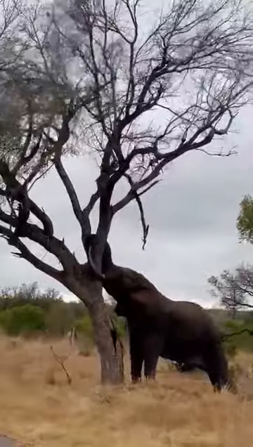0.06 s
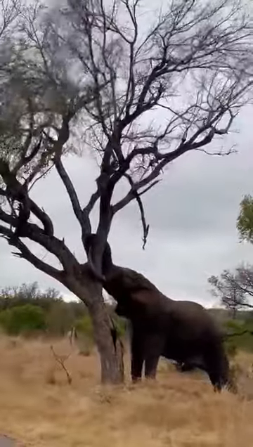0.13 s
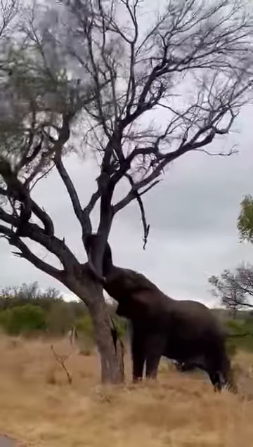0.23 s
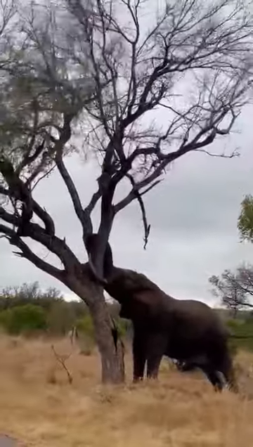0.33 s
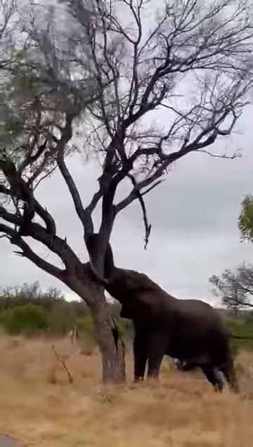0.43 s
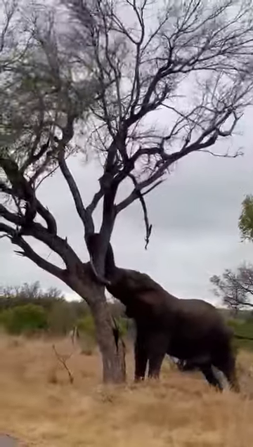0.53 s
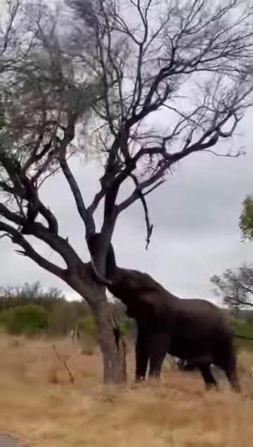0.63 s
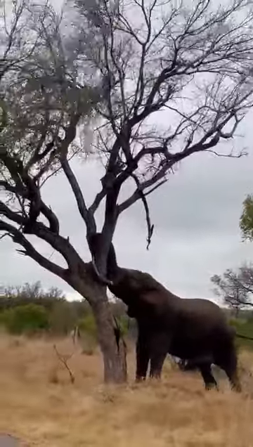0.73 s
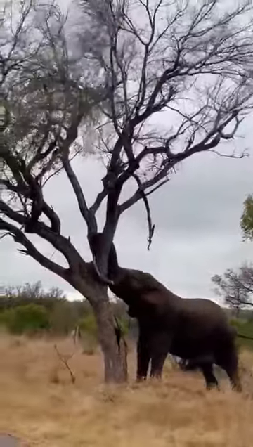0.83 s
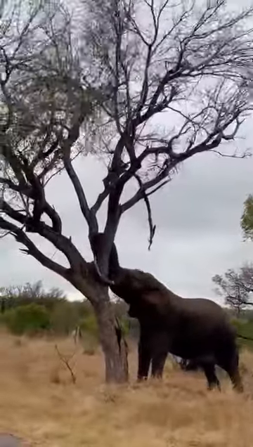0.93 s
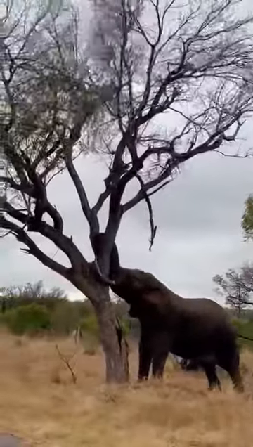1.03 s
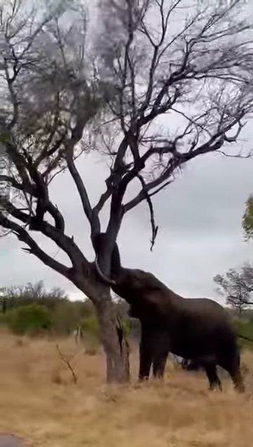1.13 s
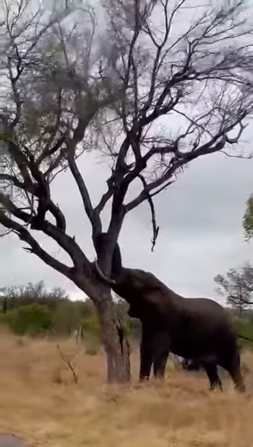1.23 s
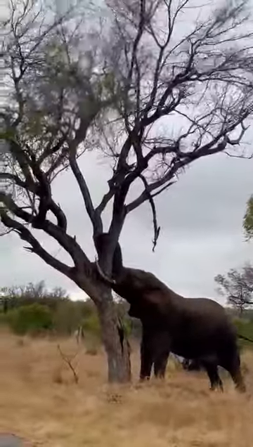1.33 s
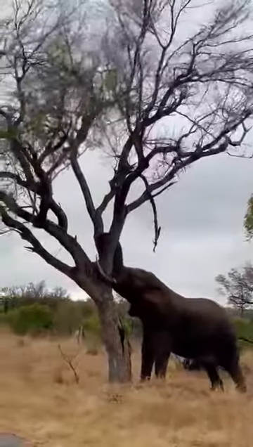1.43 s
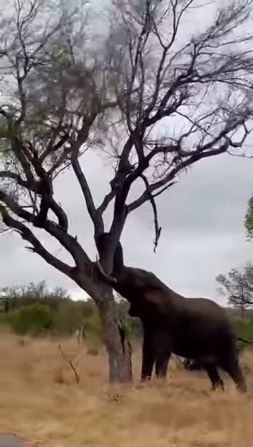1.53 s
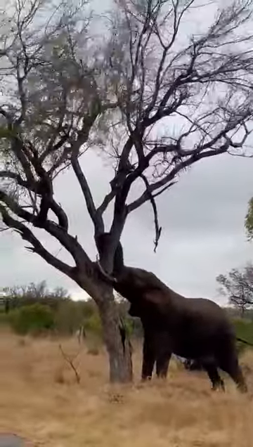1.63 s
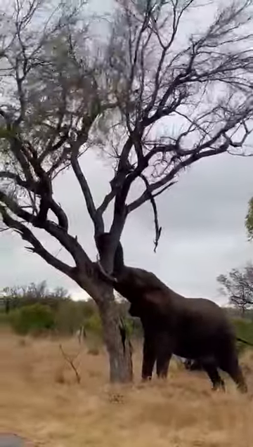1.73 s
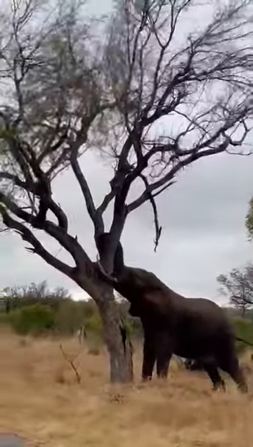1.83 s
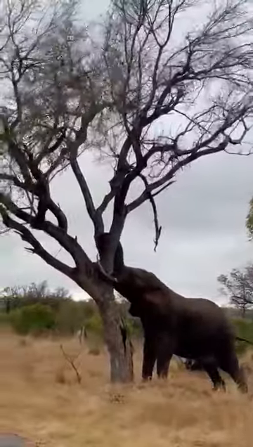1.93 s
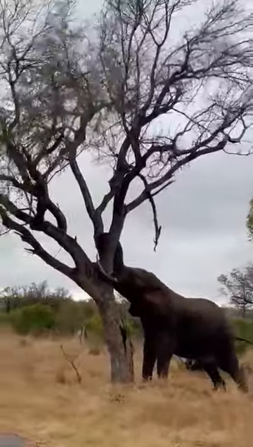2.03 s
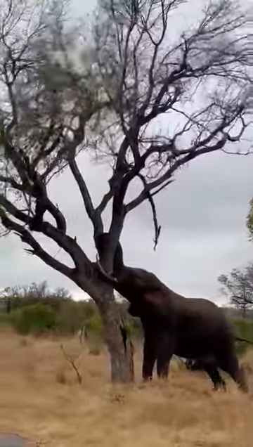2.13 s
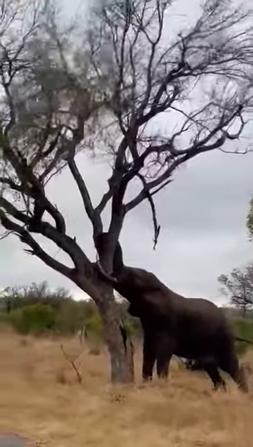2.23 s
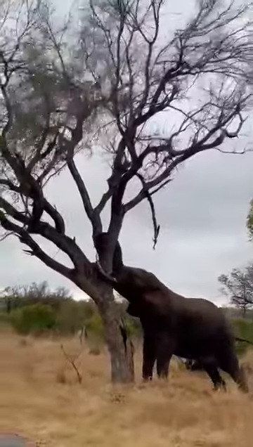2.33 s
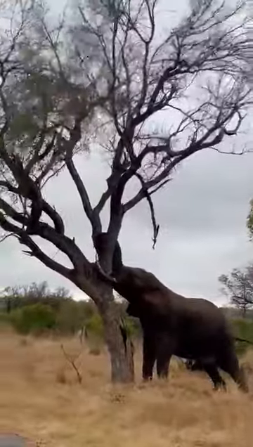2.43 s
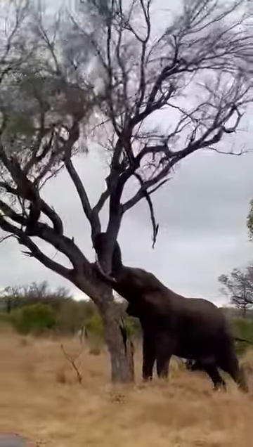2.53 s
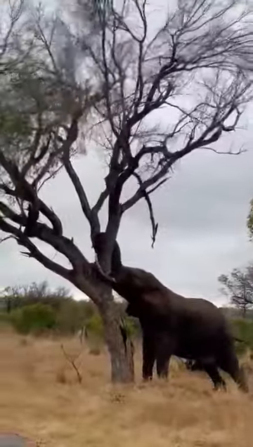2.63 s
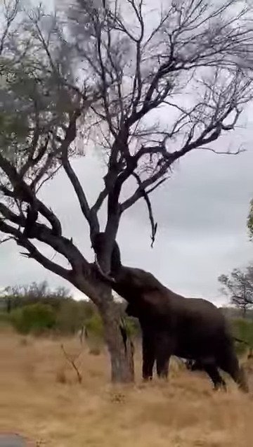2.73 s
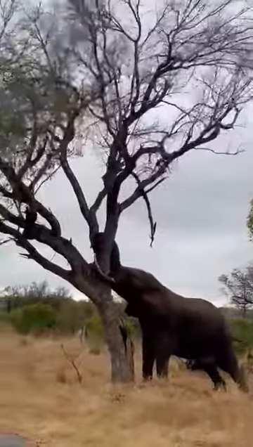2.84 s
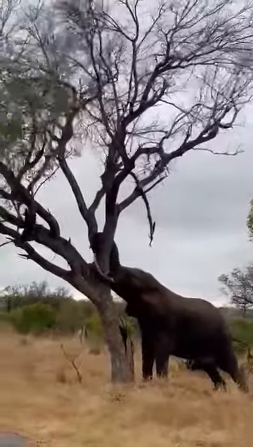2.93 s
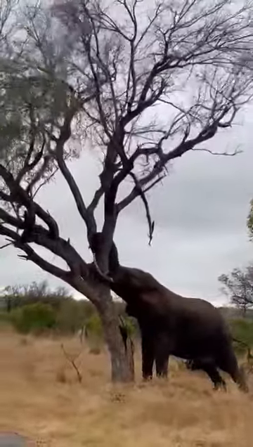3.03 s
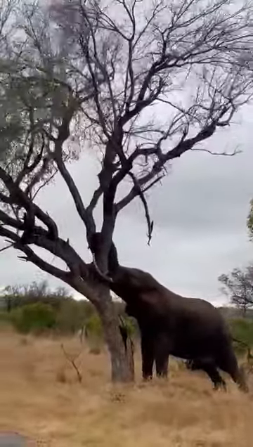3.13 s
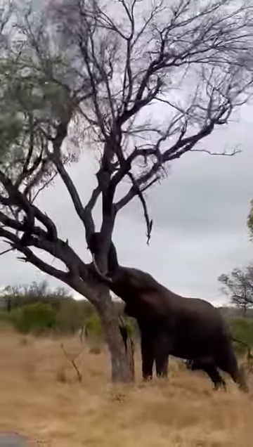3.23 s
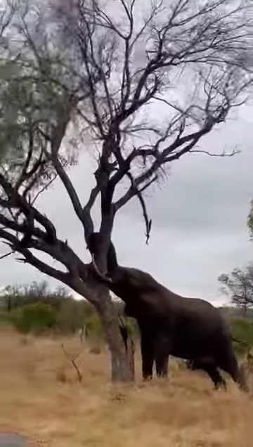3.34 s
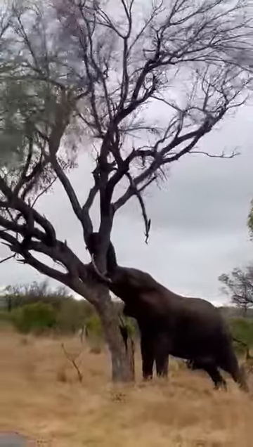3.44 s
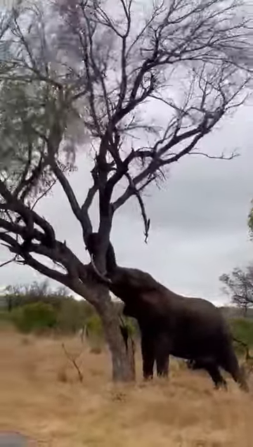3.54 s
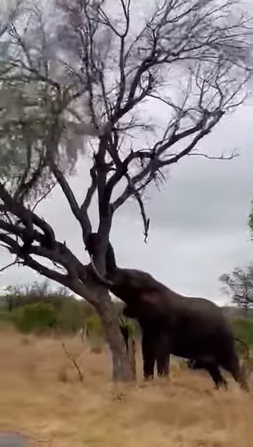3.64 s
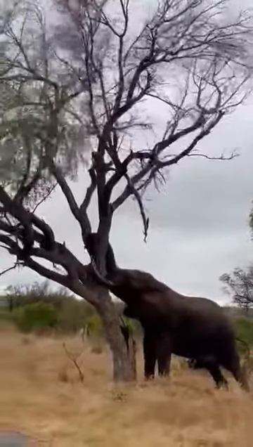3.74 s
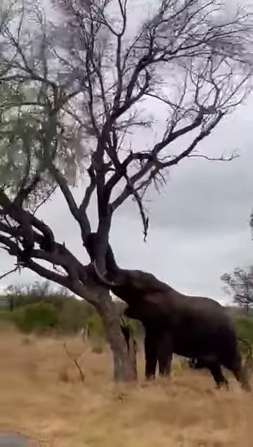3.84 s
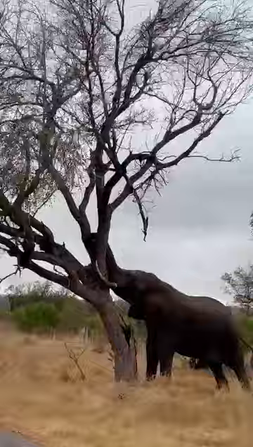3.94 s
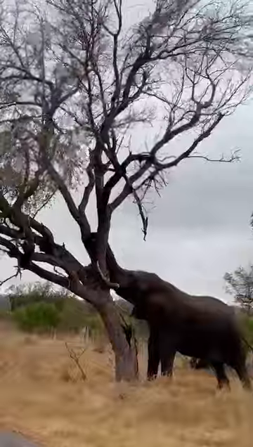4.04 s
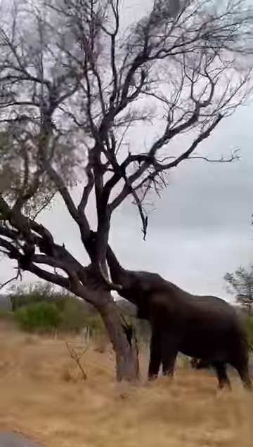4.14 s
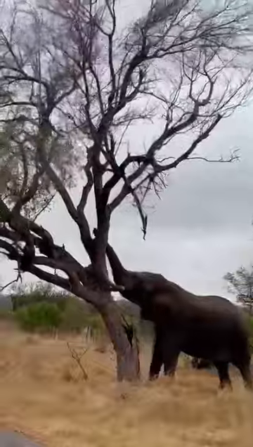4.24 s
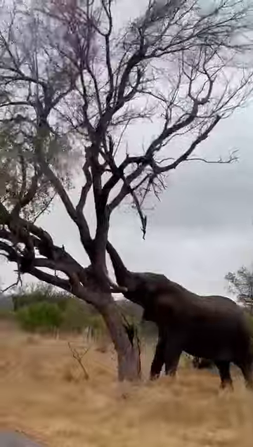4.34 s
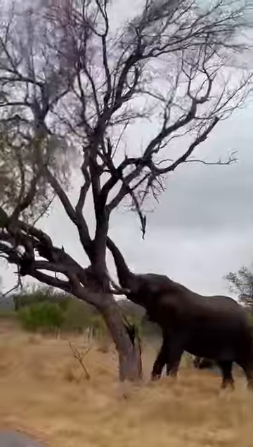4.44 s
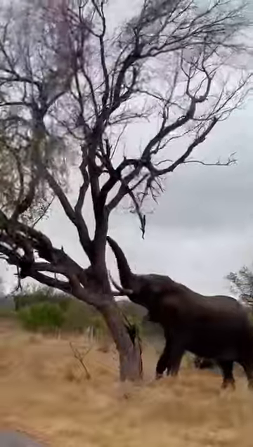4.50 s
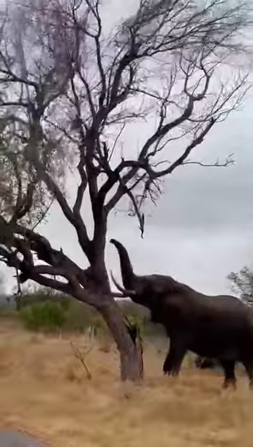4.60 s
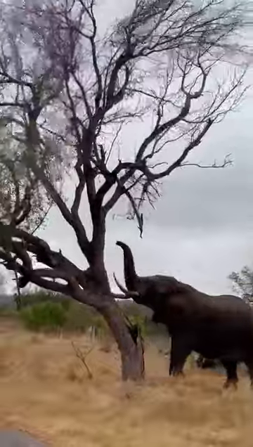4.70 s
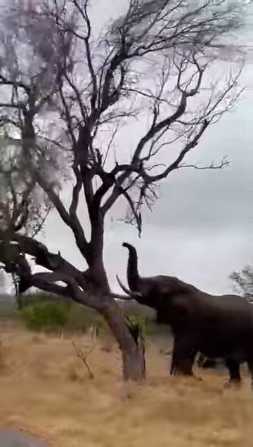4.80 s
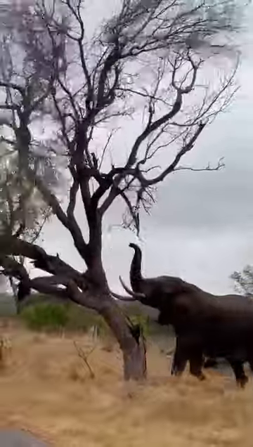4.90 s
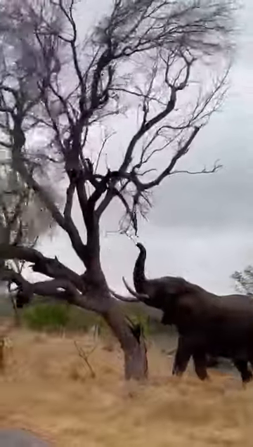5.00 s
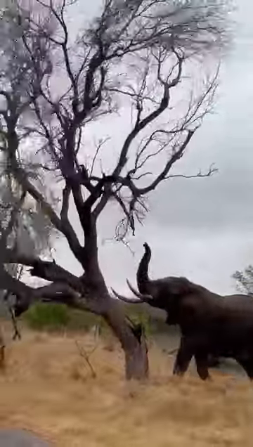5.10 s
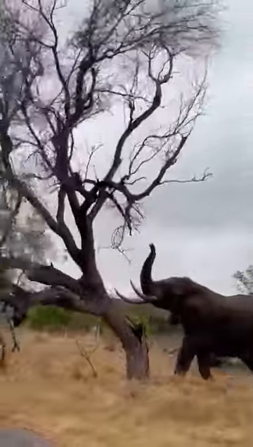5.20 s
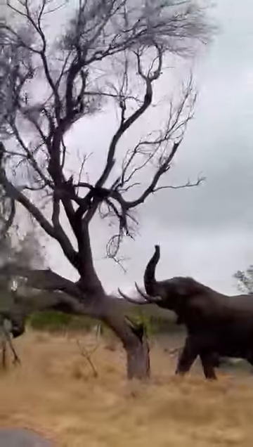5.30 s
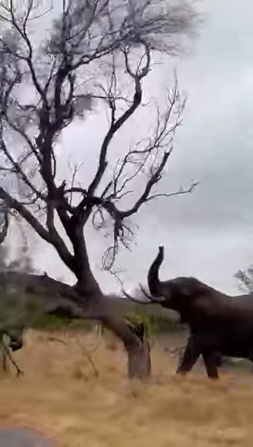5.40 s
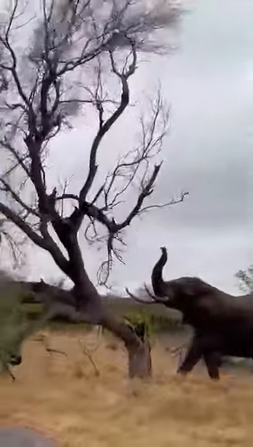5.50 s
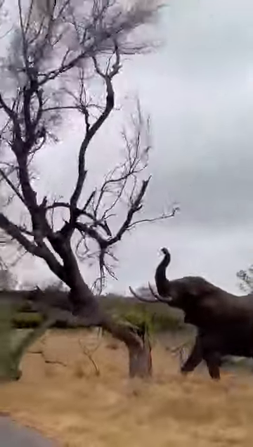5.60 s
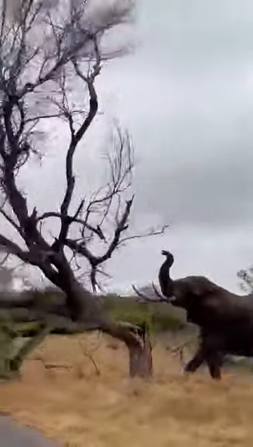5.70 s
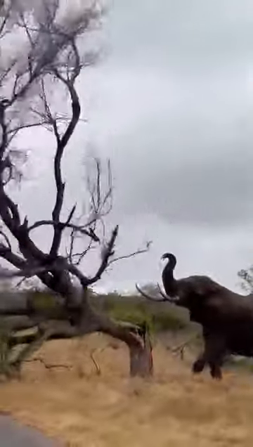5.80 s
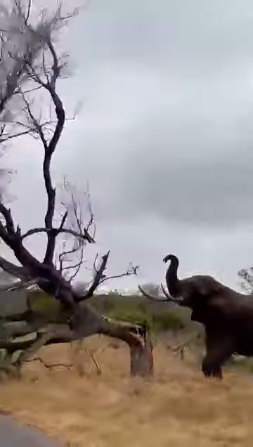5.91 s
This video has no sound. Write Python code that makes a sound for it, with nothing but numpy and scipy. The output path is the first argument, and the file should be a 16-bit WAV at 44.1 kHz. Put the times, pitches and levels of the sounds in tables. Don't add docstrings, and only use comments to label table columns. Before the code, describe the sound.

A trunk creaks in short stuttering groans, then wood fibres snap faster and faster until heavy limbs break and crash outdoors.

```python
import sys
import numpy as np
from scipy import signal
from scipy.fft import rfft, irfft
from scipy.io import wavfile
from scipy.ndimage import uniform_filter1d, minimum_filter1d

SR = 44100
rng = np.random.default_rng(int(sys.argv[2]) if len(sys.argv) > 2 else 0)


def store_pcm(level_fs):
    pcm = np.round(np.clip(level_fs, -1, 1) * 32767).astype(np.int16)
    wavfile.write(sys.argv[1], SR, np.atleast_2d(pcm).T)


def how_loud(loudness_db):
    steps = np.asarray(loudness_db, float) / 20
    return 10 ** steps


N = 262836

SIZE, LEAD_S = 4096, .01
HZ = np.maximum(np.fft.rfftfreq(SIZE, 1 / SR), 1)
AGE_S = np.arange(SIZE) / SR
SMALL_THUD_DB = 5.5


def curve(rows):
    rows = np.array(rows)
    return np.interp(np.arange(N) / SR, rows[:, 0], rows[:, 1])


def shape(hz, points):
    point_hz, point_db = np.transpose(points)
    return how_loud(np.interp(np.log(hz), np.log(point_hz), point_db))


def colour(x, points):
    return irfft(rfft(x) * shape(np.maximum(np.fft.rfftfreq(N, 1 / SR), 1), points), N)


def unit(x):
    return x / np.sqrt(np.mean(x ** 2))


def walk(rate_hz):
    k = int(SR / rate_hz)
    return uniform_filter1d(np.repeat(rng.standard_normal(N // k + 1), k), k)[:N]


def hump(hz, octaves):
    return np.exp(-.5 * (np.log2(HZ / hz) / octaves) ** 2)


def bending(cycles):
    return np.exp(-2j * np.pi * (cycles * np.log(HZ) + HZ * (LEAD_S - cycles / 3000)))


def peak(spectrum):
    wave = irfft(spectrum, SIZE)
    return wave / np.abs(wave).max()


def add(out, wave, s):
    i = int((s - LEAD_S) * SR)
    out[max(i, 0):i + SIZE] += wave[max(-i, 0):N - i]


def aftermath(rows, column, db, decay_s):
    rows, power = np.array(rows), np.zeros(N)
    np.add.at(power, (rows[:, 0] * SR).astype(int), how_loud(2 * (rows[:, column] + db)))
    return signal.lfilter([1], [1, -np.exp(-2 / (decay_s * SR))], power)


def plain():
    # frequency in Hz, level in dB per Hz.
    air_spectrum = [(15, -17), (25, -14), (49, 0), (358, -19.5), (500, -19.5), (6290, -56), (12000, -37),
                    (15600, -78)]
    air = colour(rng.standard_normal(N), air_spectrum)
    return how_loud(-69.5 + 7.5) * unit(air * how_loud(2.7 * walk(14)))


def wind():
    # start in seconds, level in dB, hold in seconds.
    gusts = [
        (1.604, -35, 0.035),
        (1.681, -39, 0.015),
        (1.731, -45.5, 0.067),
        (1.812, -49, 0.012),
        (4.264, -48, 0.026),
        (5.37, -37, 0.036),
        (5.596, -35, 0.014),
        (5.866, -26, 0.01),
    ]
    calm_db, rise_db_s, fall_db_s = -68.5, 697, 558
    t = np.arange(N) / SR
    levels_db = []
    for s, top_db, hold_s in gusts:
        rise_db = rise_db_s * np.maximum(s - t, 0)
        fall_db = fall_db_s * np.maximum(t - s - hold_s, 0)
        levels_db.append(top_db - rise_db - fall_db)
    level_db = np.maximum(np.max(levels_db, axis=0), calm_db)
    spectrum = [(15, -67), (35, 1.5), (60, 3.5), (110, -5.0), (250, -21.5), (600, -104)]
    puffs = colour(rng.standard_normal(N), spectrum)
    return unit(puffs * how_loud(1.0 * walk(8.0))) * how_loud(level_db)


def litter(rows):
    # frequency in Hz, level in dB per Hz.
    twig_spectrum = [(250, -48), (600, 6.5), (1600, 2.5), (3200, 10.5), (6500, -1.5), (9000, -37),
                     (13000, -25)]
    # frequency in Hz, level in dB per Hz.
    leaf_spectrum = [(250, -40), (600, 1), (1600, 3.5), (3200, 1.5), (4300, -1), (6500, -6), (9000, -16.5),
                     (13000, -16.5)]
    # time in seconds, share of smooth leaf hiss 0-1.
    leaf_share = [(0, .9), (2.9, .9), (3.0, .2), (5.55, .3), (5.75, .75)]
    # time in seconds, level in dB.
    shaking = [(0, -51), (.2, -59.5), (.42, -61.5), (.55, -54.5), (.7, -61.5), (1.0, -55.5), (1.6, -60.5),
               (2.28, -68), (2.34, -48.5), (2.7, -61.5), (2.9, -60.5), (3.15, -46), (4.4, -42.5),
               (4.85, -39.5), (5.45, -30), (5.65, -31.5), (5.75, -24), (5.96, -22.5)]
    clump = how_loud(1.5 * rng.exponential(size=N) + 2.2 * walk(60))
    clicks = (rng.random(N) < 1100 / SR) * clump * rng.standard_normal(N)
    smear = rng.standard_normal(1024) * np.exp(-AGE_S[:1024] / .001)
    twigs = unit(colour(signal.fftconvolve(clicks, smear)[:N], twig_spectrum))
    twigs = unit(colour(twigs, [(500, -2), (2200, -9), (7000, -5)]))
    leaves = unit(colour(rng.standard_normal(N), leaf_spectrum)) * how_loud(2.0 * walk(30))
    limb_spectrum = [(50, -12), (110, 17.5), (260, 14.5), (600, 12.0), (1200, -53.0)]
    limbs = unit(colour(rng.standard_normal(N), limb_spectrum)) * how_loud(0.41 * walk(30))
    shake = how_loud(curve(shaking))
    crackle = np.sqrt(shake ** 2 + aftermath(rows, column=1, db=-14.5, decay_s=.0092))
    rumble = np.sqrt((shake * how_loud(-7)) ** 2 + aftermath(rows, column=4, db=-17.5, decay_s=.039))
    share = curve(leaf_share)
    return crackle * (np.sqrt(share) * leaves + np.sqrt(1 - share) * twigs) + rumble * limbs


def creak(slips, load, modes, grit_db, soft_hz, bass_db, scrape_db, upper_cycles, early_s):
    # delay in ms, level in dB.
    forks = [
        (4.5, -5),
        (9.6, -6.5),
        (13.1, -11),
    ]
    out = np.zeros(N)
    drift = 1 + .01 * walk(8)
    paths = 1 + how_loud(-27) * rfft(rng.standard_normal(SIZE) * np.exp(-AGE_S / .012))
    paths = paths + sum(how_loud(db) * np.exp(-2j * np.pi * HZ * ms / 1000) for ms, db in forks)
    travel = HZ ** 2 / (HZ ** 2 + 90 ** 2) / (1 + (HZ / soft_hz) ** 4)
    bass = 1 / (1 + (HZ / 700) ** 4)
    rub = np.exp(-.5 * (1000 * AGE_S / 1.3 - 2) ** 2)
    rub = how_loud(scrape_db) * rub / np.linalg.norm(rub)
    grain = rng.standard_normal(SIZE)
    when_s, count = np.transpose(slips)
    load_s, treble_db = np.transpose(load)
    bass_db = bass_db + .35 * (treble_db + 30)
    upper_path = bending(upper_cycles) * np.exp(2j * np.pi * HZ * early_s)
    for t in np.interp(np.arange(count[-1] + 1), count, when_s):
        noise = rng.standard_normal((2, SIZE))
        ring = 0
        for (hz, width_hz, db), luck in zip(modes, noise[1, -20:]):
            gain = how_loud(db + 1.8 * luck * (hz > 400))
            ring = ring + gain / (1 + 2j * (HZ - hz * drift[int(t * SR)]) / width_hz)
        ring = travel * ring
        fresh = how_loud(grit_db - 16) * noise[0] * np.exp(-AGE_S / .009)
        grit = paths + rfft(rub * (grain + .45 * noise[1]) + fresh)
        groan = 1 + how_loud(grit_db - 26) * rfft(noise[0, ::-1] * np.exp(-AGE_S / .012))
        high = peak(ring * (1 - bass) * grit * upper_path)
        low = peak(ring * bass * groan * bending(1.2))
        high = how_loud(np.interp(t, load_s, treble_db) + .7 * noise[1, -1]) * high
        add(out, high + how_loud(np.interp(t, load_s, bass_db)) * low, t - .0002)
    return out


def trunk_creaks():
    # time in seconds, slips so far.
    slip_runs = [
        [(.7717, 0), (.8069, 1), (.8379, 2), (.8975, 4), (.9538, 6), (.9911, 8), (1.0454, 11), (1.2541, 23),
         (1.2855, 25), (1.3585, 29), (1.4585, 35)],
        [(2.1448, 0), (2.2106, 4), (2.2956, 9)],
        [(2.313, 0), (2.3345, 1), (2.355, 2), (2.3735, 3), (2.408, 5), (2.529, 12), (2.7325, 24)],
    ]
    # time in seconds, strength of the slips in dB.
    load_runs = [
        [(.77, -27), (.95, -27.5), (1.0, -29.5), (1.26, -30), (1.4, -30.5), (1.46, -44)],
        [(2.146, -42), (2.16, -33.5), (2.22, -34), (2.3, -37.5)],
        [(2.31, -24.5), (2.4, -28.5), (2.53, -29), (2.63, -33.5), (2.67, -41), (2.74, -78)],
    ]
    # frequency in Hz, width in Hz, level in dB.
    mode_runs = [
        [(272, 25, 21.5), (349, 38, 13), (533, 60, 11), (840, 990, 3), (1086, 260, -0.5), (1500, 440, -6),
         (1500, 56, 8), (1870, 160, -3.5), (2230, 130, -2.5), (3030, 560, -2.5), (3700, 610, -3)],
        [(216, 54, 26), (347, 50, 21), (535, 160, 16.5), (780, 65, -7), (930, 66, 9), (1150, 78, 7),
         (1380, 90, 10.5), (1560, 100, 10), (1700, 70, -5), (2000, 90, -4), (2400, 120, -3), (3500, 1300, -8.5)],
        [(122, 20, -2), (161, 120, 21.5), (520, 250, 11.5), (827, 48, 10), (1020, 82, 10), (1190, 130, 0.5),
         (1440, 62, 3), (1720, 550, -2), (2160, 310, 5.5), (2620, 330, 8), (3500, 360, -1), (4500, 890, -14),
         (5360, 1700, 0.5)],
    ]
    # share of each slip that is new, in dB.
    grit_db = [-10, -10, -5]
    soft_hz = [2700, 2900, 4250]
    bass_db = [-43.5, -44.5, -37]
    scrape_db = [-14, -5, 8]
    upper_cycles = [1, 1.4, 3.6]
    early_s = [0, 0, .0016]
    runs = zip(slip_runs, load_runs, mode_runs, grit_db, soft_hz, bass_db, scrape_db,
               upper_cycles, early_s)
    return sum(creak(*run) for run in runs)


def breaks(rows, tear_ms, thud_db=0., knock_db=0.):
    full = []
    for row in rows:
        if len(row) < 4:
            row = (*row, row[1] + knock_db)
        if len(row) < 5:
            row = (*row, row[3] + thud_db)
        full.append((*row, tear_ms))
    return full


def cracks(rows, cycles=1.6, tail_db=-20, tail_ms=22, ragged_db=4.5, thud_hz=160, thud_octaves=.66,
           returns_db=0., click_db=19, wide_db=2.5, knock_hz=598, knock_octaves=.92, top_hz=15000):
    out = np.zeros(N)
    late = bending(cycles)
    for s, snap_db, hz, knock_db, thud_db, tear_ms in rows:
        noise = rng.standard_normal((4, SIZE))
        tear_ms = max(tear_ms, .3)
        splinters = how_loud(ragged_db * np.repeat(noise[3, :SIZE // 64], 64))
        tail = how_loud(tail_db) * np.exp(-1000 * AGE_S / tail_ms) / np.sqrt(splinters)
        lead = how_loud(-9) * np.exp(-1000 * AGE_S[::-1] / 2.3)
        tear = splinters * (np.exp(-1000 * AGE_S / tear_ms) + tail + lead)
        parting = how_loud(click_db) / np.sqrt(tear_ms)
        band = how_loud(3.5) * hump(hz, .18) + how_loud(wide_db) * hump(2034, .87) + how_loud(-83)
        snap = (parting + rfft(noise[0] * tear)) * band / (1 + (HZ / top_hz) ** 8)
        knock_returns = how_loud(returns_db - 14.5) * rfft(noise[1] * np.exp(-AGE_S / .013))
        thud_returns = how_loud(returns_db - 23.5) * rfft(noise[2] * np.exp(-AGE_S / .015))
        knock = (1 + knock_returns) * hump(knock_hz, knock_octaves)
        thud = (1 + thud_returns) * hump(thud_hz, thud_octaves)
        wave = how_loud(snap_db + 3) * peak(snap * late)
        wave = wave + how_loud(knock_db) * peak(knock * late) + how_loud(thud_db) * peak(thud * late)
        add(out, wave, s + .0006)
    return out


def chips():
    # time in seconds, peak in dB, pitch in Hz.
    chip_rows = [(1.2984, -29, 1580), (1.3455, -27, 2500), (1.356, -31, 1600), (1.506, -45, 1500),
                 (1.5391, -37, 1580), (2.829, -35, 2960), (3.085, -47, 3000), (3.1206, -28, 2460),
                 (3.275, -33, 3080), (3.3428, -46, 3850), (3.455, -38, 2500), (3.595, -46, 2200),
                 (3.6289, -31, 3080), (3.8017, -35, 2460), (3.9731, -30, 3080), (4.084, -35, 2800),
                 (4.0986, -35, 2460), (4.227, -17, 3640), (4.3943, -36, 3080), (4.4692, -31, 3080),
                 (4.5172, -27, 3080), (4.5449, -31, 3850), (4.613, -21, 2500), (4.664, -41, 2500),
                 (4.753, -29, 2500), (4.759, -22, 2600), (4.7705, -24, 2400), (4.8737, -35, 3080),
                 (5.004, -25, 1970), (5.2391, -26, 1580), (5.4962, -18, 1060), (5.5014, -13, 1050),
                 (5.8031, -19, 4810), (5.8349, -8, 2430)]
    rows = breaks(chip_rows, 2.2, SMALL_THUD_DB, knock_db=-18.5)
    return cracks(rows, tail_db=-13, ragged_db=5.0, wide_db=-4)


def flying_splinters():
    # time in seconds, peak in dB, pitch in Hz.
    splinter_rows = [(.018, -62, 1500), (.085, -51, 4500), (.105, -46, 3000), (.296, -56, 4950),
                     (.35, -53, 5030), (1.934, -48.5, 5500), (2.8838, -46.5, 3500), (3.069, -35, 3000),
                     (3.0988, -36, 1500), (3.155, -18.5, 2700), (3.195, -26, 1590), (3.21, -28, 2200),
                     (3.296, -26.5, 4800), (3.325, -52, 2200), (3.3907, -29, 2460), (3.4994, -39, 4020),
                     (3.554, -29.5, 2200), (3.6653, -23.5, 2460), (3.675, -23.5, 2630), (3.756, -52, 1800),
                     (3.8306, -35, 2110), (3.8775, -25.5, 2910), (4.040, -42, 2820), (4.091, -26.5, 2620),
                     (4.238, -29, 2500), (4.292, -29, 3080), (4.345, -34, 2830), (4.3979, -30, 3880),
                     (4.4596, -22, 3500), (4.5585, -43, 2470), (4.639, -13, 3100), (4.709, -18, 2550),
                     (4.728, -25, 4000), (4.8055, -22.5, 2940), (4.8673, -32, 1410), (4.912, -18, 2620),
                     (4.972, -14.5, 2480), (5.064, -28, 3000), (5.138, -25, 2500), (5.186, -17, 2750),
                     (5.259, -28, 1500), (5.346, -22.5, 3600), (5.542, -14, 2970), (5.6076, -19, 1500),
                     (5.618, -26, 3000), (5.674, -19, 1260), (5.7264, -20.5, 1560), (5.7942, -27, 4080),
                     (5.8226, -23, 2810), (.7995, -36.5, 7500)]
    return cracks(breaks(splinter_rows, 2.3, SMALL_THUD_DB, knock_db=-18.5), tail_db=-13)


def trunk_jolts():
    # time in seconds, peak in dB, pitch in Hz.
    jolt_rows = [(1.263, -24, 1030), (1.3022, -25, 1410), (1.3397, -29, 1560), (1.3735, -27.5, 1720),
                 (1.3993, -27.5, 2610), (1.4238, -31, 2280), (1.4478, -30, 1200), (1.483, -28.5, 1020),
                 (1.4911, -27.5, 1700), (1.5191, -28, 1610), (1.5587, -30, 1560), (1.5885, -38, 1600)]
    rows = breaks(jolt_rows, 3.1, thud_db=-3.5, knock_db=-2.5)
    return rows, cracks(rows, cycles=1.3, tail_db=-22, tail_ms=52, ragged_db=1.5)


def fibre_breaks():
    # time in seconds, peak in dB, pitch in Hz.
    ticks = [(.0352, -32, 1700), (.1751, -40, 2800), (2.7854, -40.5, 1780), (2.9345, -38, 3870),
             (2.9583, -30, 3450), (2.9913, -27, 2860), (3.113, -30, 2160), (3.4816, -28.5, 2700),
             (3.5193, -32.5, 3430), (3.5371, -25.5, 1990), (3.7427, -30.5, 2230), (3.927, -22, 1570),
             (3.9598, -33, 2460), (4.0347, -25.5, 3270), (4.0688, -32, 3030), (4.1953, -30, 2900),
             (4.3735, -29.5, 2900), (4.596, -16, 1330), (4.9472, -20, 2130), (5.1, -19.5, 2060),
             (5.4794, -12, 3060), (5.8903, -12.5, 4000), (3.3507, -30, 3000), (3.5746, -38, 2500),
             (3.9064, -29.5, 2560), (5.203, -19, 2900), (5.297, -16, 2510)]
    # time in seconds, peak in dB, pitch in Hz, limb knock in dB.
    snaps = [(.0101, -28.5, 965, -31.5), (.0457, -35, 3020, -37), (.1239, -31, 4500, -44),
             (.9647, -37.5, 1240, -43), (3.132, -23, 4900, -32.5), (3.1741, -19, 2720, -30),
             (3.2203, -27, 1480, -34), (3.251, -20, 2850, -27), (3.4174, -21.5, 2350, -32.5),
             (3.5876, -29, 2000, -34.5), (3.652, -12, 3500, -30), (3.9781, -26, 2720, -36),
             (4.0177, -22, 4130, -31.5), (4.1671, -25.5, 2440, -38), (4.2239, -17, 2680, -28),
             (4.9234, -17, 1890, -34), (5.1265, -24, 1290, -30.5), (5.1592, -14.5, 1700, -27),
             (5.2307, -14.5, 2900, -23), (5.2761, -17.5, 2000, -22.5), (5.3052, -10.5, 1290, -15.5),
             (5.333, -14.5, 3050, -22), (5.3713, -12, 2440, -17), (5.435, -17, 2900, -28),
             (5.4891, -19, 1120, -26), (5.533, -11.5, 1620, -17)]
    # time in seconds, peak in dB, pitch in Hz, limb knock in dB.
    tears = [(.1401, -30.5, 1900, -30.5), (.1545, -32.5, 2950, -51), (.7991, -27.5, 3200, -40.5),
             (3.0077, -21.5, 1700, -34.5), (3.0517, -21.5, 2830, -41.5), (3.3776, -24, 3560, -33),
             (3.612, -29, 1730, -31.5), (3.6338, -22.5, 1860, -43), (3.7027, -20, 2580, -31.5),
             (3.849, -25, 1720, -40), (4.1122, -10.5, 3230, -25.5), (4.211, -23, 3260, -39),
             (4.23, -18, 3460, -36), (4.4885, -16.5, 2660, -35.5), (4.5235, -24.5, 3250, -32),
             (4.579, -18.5, 2320, -23.5), (4.6331, -12, 3140, -26), (4.673, -7.5, 1330, -26.5),
             (4.7013, -12.5, 3400, -37), (4.7655, -20.5, 2610, -31), (4.8005, -24.5, 2760, -33),
             (4.904, -13, 1020, -18), (4.9646, -19.5, 1150, -16.5), (5.0329, -13, 2840, -22),
             (5.1786, -13.5, 2080, -18), (5.4096, -13, 1380, -18), (5.5202, -19, 1150, -17)]
    # time in seconds, peak in dB, pitch in Hz,
    # knock in dB, thud in dB.
    blows = [(3.109, -20.5, 3200, -48, -32.5), (3.147, -13, 2700, -29.5, -20.5),
             (3.2836, -18.5, 3370, -27, -56), (3.4468, -18, 2400, -31, -30.5),
             (4.428, -12, 3440, -26, -28.5), (4.569, -14, 2320, -24.5, -35),
             (4.6882, -4.5, 1560, -15, -25.5), (4.8806, -16, 1050, -22, -23.5),
             (5.0204, -17, 2850, -54, -29.5), (5.0571, -20, 2900, -67, -30),
             (5.2502, -15.5, 1300, -21.5, -51), (5.6692, -16, 1120, -23.5, -49),
             (5.744, -11.5, 1480, -10.5, -30), (5.8441, -9, 2000, -10.5, -20.5)]
    rows = breaks(ticks, 2.4, SMALL_THUD_DB, knock_db=-31) + breaks(snaps, 2.67, thud_db=-2)
    rows = rows + breaks(tears, 3.94, thud_db=-4) + breaks(blows, 2.5)
    return rows, cracks(rows)


def whip_breaks():
    # time in seconds, peak in dB, pitch in Hz, knock in dB, thud in dB.
    whip_rows = [
        (2.8158, -16.5, 3230, -38, -40.5),
        (3.7917, -8, 1710, -27.5, -23),
        (4.2648, -6.5, 3200, -23.5, -17),
        (4.3155, -6, 2370, -23.5, -27.5),
        (5.4601, -11.5, 1780, -19, -47),
        (5.7006, -8, 4780, -28, -54),
    ]
    rows = breaks(whip_rows, 1.3)
    return rows, cracks(rows, tail_db=-37, click_db=21, wide_db=-2, top_hz=8300)


def light_limb():
    # time in seconds, peak in dB, pitch in Hz, knock in dB, thud in dB.
    light_rows = [
        (5.9386, -8.5, 1090, -6.5, -4),
    ]
    return cracks(breaks(light_rows, 2.5), thud_hz=269)


def main_limbs():
    # time in seconds, peak in dB, pitch in Hz, knock in dB, thud in dB.
    pair_rows = [
        (5.3851, -6, 2700, -14.5, -4),
        (5.3915, -10.5, 1900, -29, -24),
    ]
    # time in seconds, peak in dB, pitch in Hz, knock in dB, thud in dB.
    heavy_rows = [
        (5.553, -7, 1790, -3, -4.5),
    ]
    pair, heavy = breaks(pair_rows, 5.2), breaks(heavy_rows, 5.2)
    sound = cracks(pair, thud_hz=166, thud_octaves=.89, returns_db=-5.5, cycles=1.5,
                   knock_hz=536, knock_octaves=.31)
    sound = sound + cracks(heavy, thud_hz=131, thud_octaves=.71, returns_db=-12.5, cycles=1.9,
                           knock_hz=490, knock_octaves=.55)
    return pair + heavy, sound


def scattered(x):
    cells = signal.stft(x, nperseg=768)[2]
    cells = cells * np.exp(2j * np.pi * rng.random(cells.shape))
    return unit(signal.istft(cells, nperseg=768)[1][:N]) * np.std(x)


def scene():
    # frequency in Hz, level in dB.
    phone_response = [(30, -35), (80, -1), (4000, -4), (9000, -4), (12000, -6), (14000, -32)]
    # frequency in Hz, side over mid in dB.
    side_level = [(30, -22), (90, -36), (250, -27), (650, -11), (1300, -21.5), (2600, -16), (5000, -11.5),
                  (12000, -1)]
    jolt_rows, jolts = trunk_jolts()
    fibre_rows, fibres = fibre_breaks()
    whip_rows, whips = whip_breaks()
    limb_rows, limbs = main_limbs()
    tree = trunk_creaks() + chips() + flying_splinters() + jolts + fibres + whips + light_limb() + limbs
    crown = litter(fibre_rows + jolt_rows + limb_rows + whip_rows)
    mid = plain() + wind() + colour(crown + tree, phone_response)
    side = colour(scattered(mid), side_level)
    return np.array([mid + side, mid - side])


def patchy_treble(x):
    # start in seconds, length in seconds, highest pitch in kHz.
    open_spells = [(0, .095, 11.8), (.125, .09, 12.6), (.215, .09, 10.8), (.33, .055, 12),
                   (.455, .07, 10.7), (.655, .08, 10.7), (.79, .03, 9.8), (1.29, .23, 10.8),
                   (1.925, .02, 11), (2.32, .13, 9.8), (2.45, .115, 8.7), (2.565, .07, 10.7),
                   (2.635, .045, 12), (2.68, .08, 10.5), (2.76, .022, 12), (2.785, .025, 8),
                   (2.81, .03, 9.8), (2.84, .1, 8.6), (2.945, .03, 9.8), (2.99, .045, 12.8),
                   (3.045, .03, 10.8), (3.145, .1, 11.8), (3.285, .1, 12), (3.475, .11, 11.8),
                   (3.59, .07, 10.6), (3.72, .1, 10.3), (3.94, .03, 12.1), (4.012, .045, 10),
                   (4.06, .06, 12.3), (4.12, .02, 9.5), (4.175, .06, 11.9), (4.235, .025, 8.8),
                   (4.27, .04, 10.2), (4.315, .022, 13.2), (4.337, .085, 11.3), (4.422, .015, 13),
                   (4.437, .058, 11.4), (4.51, .03, 11.3), (4.575, .035, 12.4), (4.61, .045, 10.5),
                   (4.675, .03, 13.1), (4.705, .15, 11.8), (4.905, .06, 11.1), (5.015, .035, 13.1),
                   (5.105, .055, 10), (5.245, .02, 9.2), (5.295, .06, 12.6), (5.355, .02, 10.5),
                   (5.505, .065, 10.8), (5.585, .05, 7.2), (5.64, .06, 9.3), (5.7, .025, 10.4),
                   (5.725, .055, 11.5), (5.78, .025, 10), (5.84, .2, 9.8)]
    # low in Hz, high in Hz, share of lulls 0-1.
    starved_bands = [(3500, 4100, .1), (4100, 4800, .3), (4800, 5500, .4), (5500, 6400, .5)]
    # low in Hz, high in Hz, share of time 0-1.
    mono_bands = [(0, 200, .5), (200, 450, .45), (450, 1050, .12), (1050, 1500, .4), (1500, 2100, .6),
                  (2100, 3200, .25), (3200, 3800, .7), (3800, 4700, .5), (8000, 16000, .5)]
    shut_khz, quiet_khz, quiet_db = 7.8, 9.3, -52
    fill_db, patchy_db, lull_db, hold_frames = -1, 3.5, -9, 7
    hz, s, cells = signal.stft(x, SR, nperseg=1024)
    level = np.sqrt(np.sum(np.abs(cells[0]) ** 2, axis=0))
    top_khz = np.where(level < how_loud(quiet_db), quiet_khz, shut_khz)
    for start_s, length_s, khz in open_spells:
        top_khz[(s >= start_s) & (s < start_s + length_s)] = khz
    top_hz = 1000 * top_khz + 300 * rng.standard_normal(len(s))
    cells = cells * np.where(hz[:, None] > top_hz, .01, 1)
    patches = np.repeat(rng.standard_normal((len(hz) // 32 + 1, len(s))), 32, axis=0)[:len(hz)]
    cells = cells * np.where(hz[:, None] > 1000 * shut_khz, how_loud(fill_db + patchy_db * patches), 1)
    treble = np.sqrt(np.sum(np.abs(cells[0, hz > 2000]) ** 2, axis=0))
    nearby_peak = -minimum_filter1d(-treble, size=7)
    lull = (treble < how_loud(lull_db) * nearby_peak) & (s > 3.1) & (s < 5.2)
    for low_hz, high_hz, share in starved_bands:
        lost = rng.random(len(s)) < share * lull
        cells[:, (hz >= low_hz) & (hz < high_hz)] *= np.where(lost, .05, 1)
    mid, side = (cells[0] + cells[1]) / 2, (cells[0] - cells[1]) / 2
    for low_hz, high_hz, share in mono_bands:
        choice = np.repeat(rng.random(len(s)), hold_frames)
        choice = np.roll(choice, -rng.integers(hold_frames))[:len(s)]
        side[(hz >= low_hz) & (hz < high_hz)] *= np.where(choice < share, .01, 1)
    cells = np.array([mid + side, mid - side])
    return signal.istft(cells, SR, nperseg=1024)[1][:, :N]


def band_limit(x):
    return signal.sosfilt(signal.butter(12, 13230, fs=SR, output="sos"), x)


def record(dry):
    rounded = np.tanh(0.73 * dry) / 0.66
    mix = patchy_treble(rounded)
    return band_limit(mix)


dry = scene()
out = record(dry)
store_pcm(out)
```